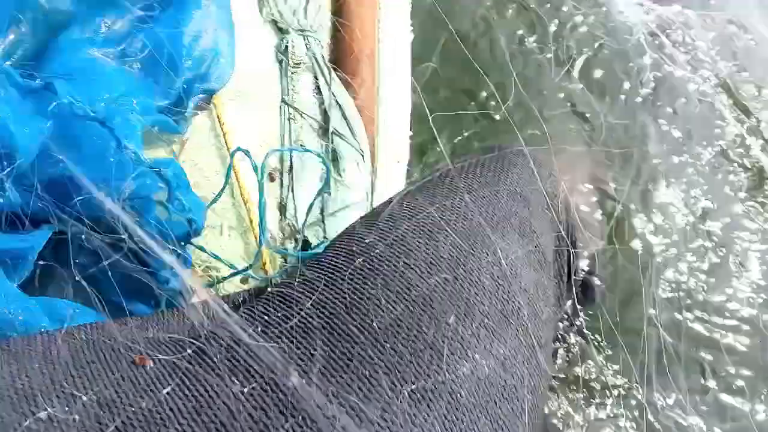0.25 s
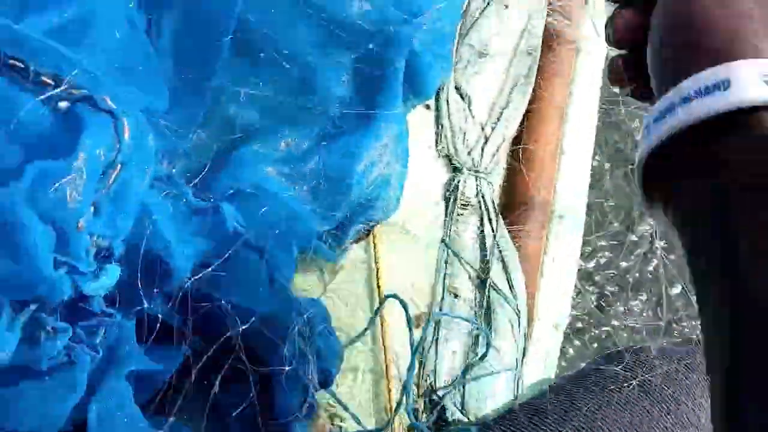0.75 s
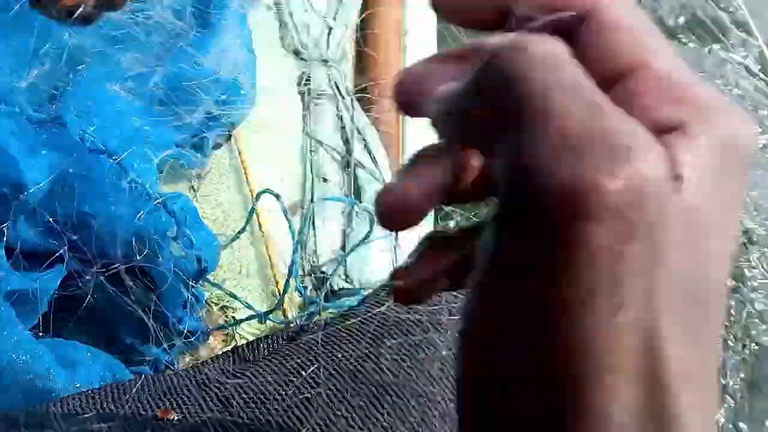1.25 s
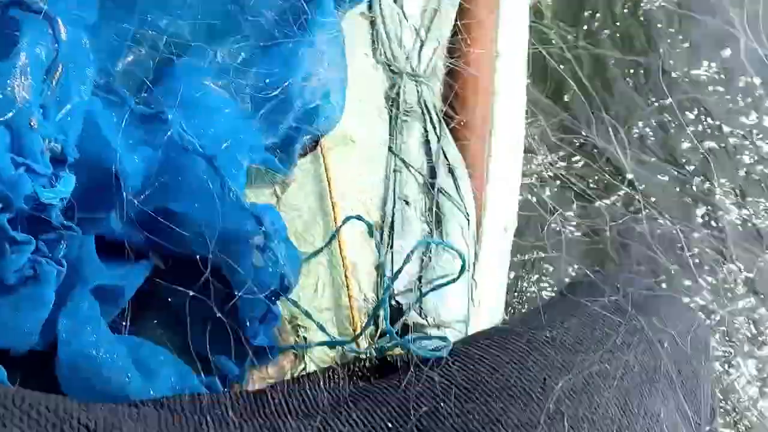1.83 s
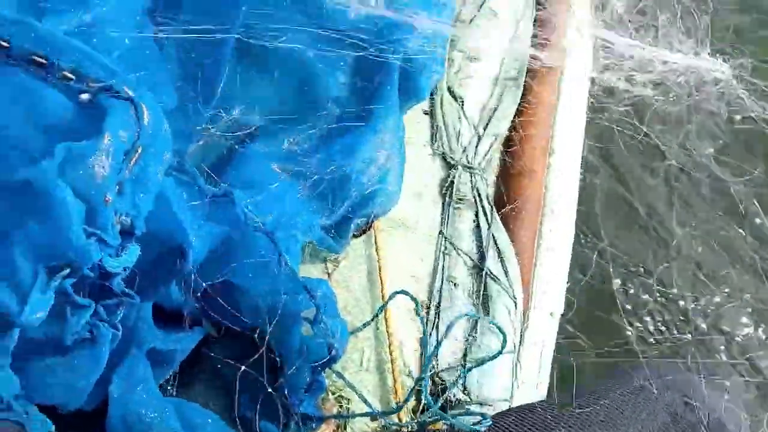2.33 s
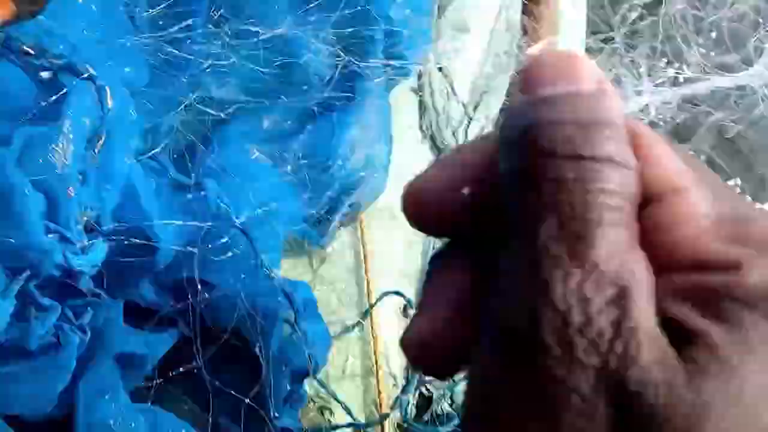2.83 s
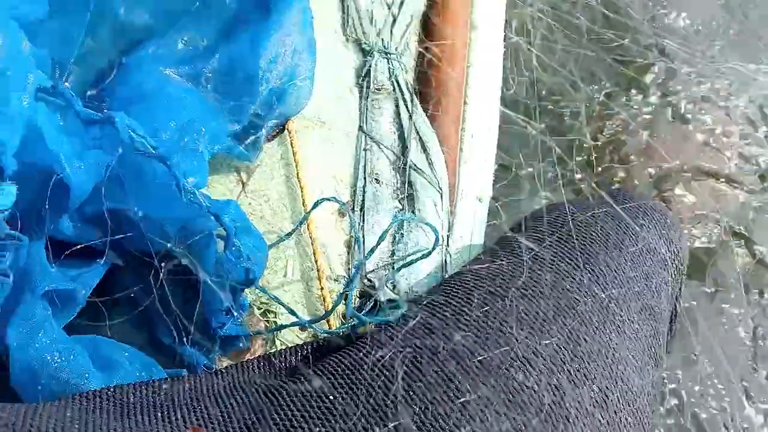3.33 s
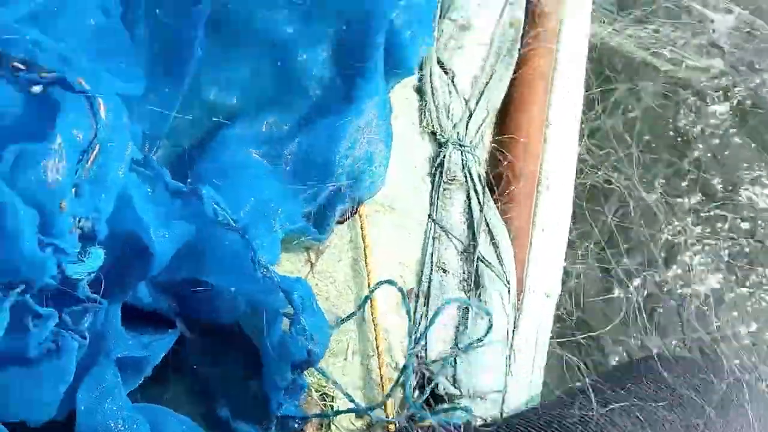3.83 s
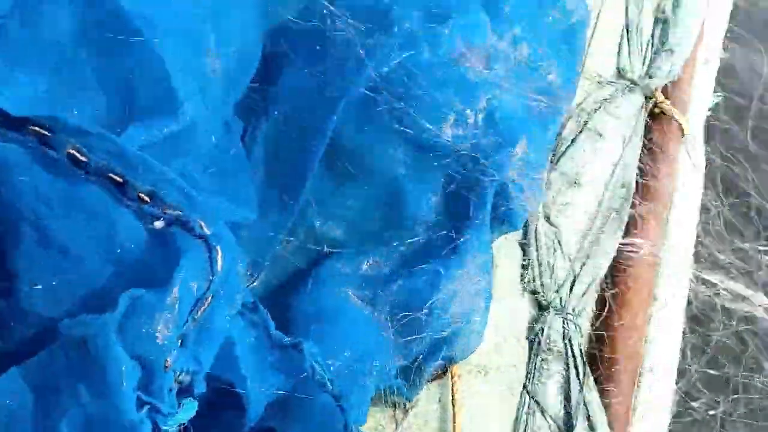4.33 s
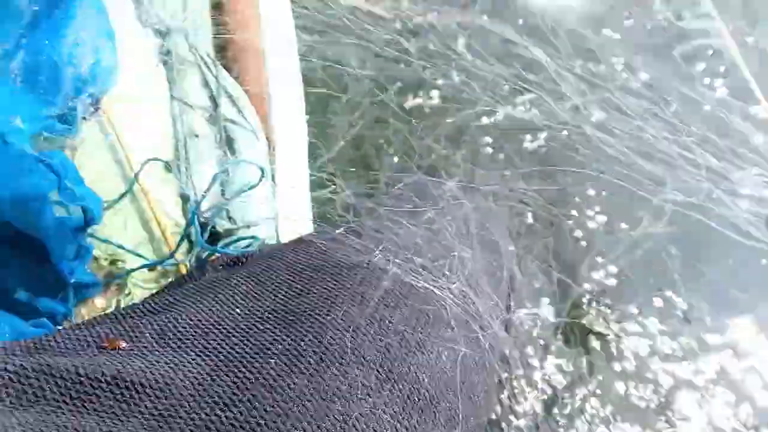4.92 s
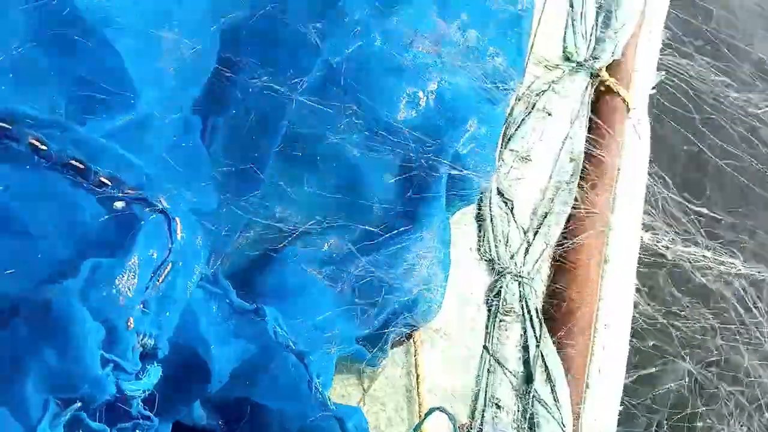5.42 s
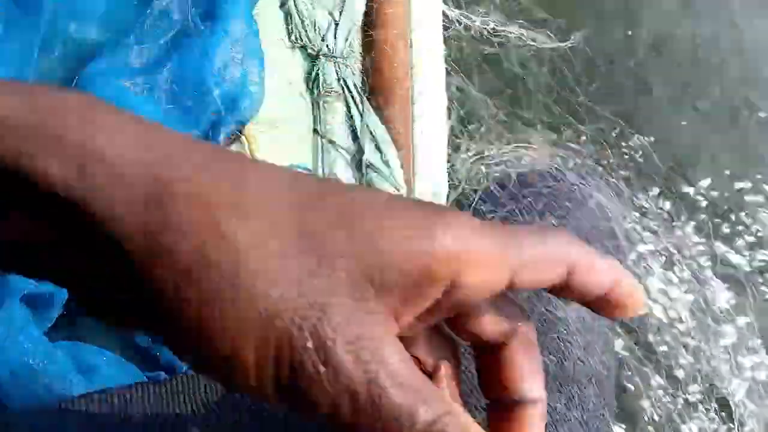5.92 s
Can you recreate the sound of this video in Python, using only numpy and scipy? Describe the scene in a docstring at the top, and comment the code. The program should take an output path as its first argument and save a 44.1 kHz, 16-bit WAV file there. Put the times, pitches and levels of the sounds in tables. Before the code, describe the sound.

Water slaps a small boat's hull, then slops, drips and plinks close by while a wet nylon net rustles and snaps in bursts.

```python
"""Water slops and gulps against a small boat and drains off a nylon net hauled in by hand, close by.
The water is sliding sine bubbles over froths of many small ones; smacks ring hull modes.
Wet filaments snap and rustle as bursts of coloured noise, denser as the pull grows.
A light wind and low heaving rumble underneath as low noise and gulps, over a faint even hiss."""
import sys
import numpy as np
from scipy import signal
from scipy.fft import rfft, irfft, next_fast_len
from scipy.io import wavfile

SR = 44100
rng = np.random.default_rng(int(sys.argv[2]) if len(sys.argv) > 2 else 0)


def transcribe(signal):
    """Save signal, clipped to [-1, 1], as a 16-bit WAV file at the path in sys.argv[1]."""
    frames = np.atleast_2d(signal).T
    limited = np.clip(frames, -1, 1)
    pcm = np.round(limited * 32767).astype(np.int16)
    wavfile.write(sys.argv[1], SR, pcm)


N = 272521
T = np.arange(N) / SR

# Water running off the net and against the hull. Each row: time in seconds, flow in dB.
FLOW_DB = [(0.0, -50.5), (0.07, -58), (0.21, -44.5), (0.26, -39.5), (0.63, -37), (1.38, -50.5),
           (1.58, -62.5), (2.11, -59.5), (2.2, -47), (2.38, -48.5), (2.87, -37), (3.02, -46.5),
           (3.34, -48.5), (3.43, -57), (3.52, -44), (3.85, -63.5), (4.25, -65.5), (4.31, -53),
           (4.38, -63.5), (4.67, -47.5), (5.1, -45.5), (5.125, -41.5), (5.52, -57.5), (5.56, -38.5),
           (6.18, -55)]
# Larger bubbles of sliding pitch. Each row: start in seconds, peak in dB, first pitch in Hz,
# pitch after one ring time in Hz, ring time in seconds.
BUBBLES = [(0.26, -27.5, 438, 373, 0.027), (0.27, -13.5, 1170, 1066, 0.0054),
           (0.238, -23.5, 650, 600, 0.013), (0.345, -25.5, 418, 388, 0.011), (0.722, -29, 516, 412, 0.021),
           (0.753, -27, 502, 760, 0.02), (0.754, -21.5, 1028, 1250, 0.012),
           (1.006, -27.5, 1230, 1170, 0.0079), (1.021, -25.5, 614, 632, 0.017),
           (1.212, -39, 984, 1107, 0.023), (2.137, -30, 473, 330.6, 0.04), (2.147, -29, 684, 631, 0.013),
           (2.247, -27.5, 198, 250, 0.026), (2.536, -24, 628, 737, 0.013), (2.588, -26.5, 634, 575, 0.018),
           (2.67, -20.5, 870, 610, 0.0052), (2.703, -21.5, 618, 628, 0.014),
           (2.754, -22.5, 610, 514, 0.0078), (2.822, -27, 560, 596, 0.013),
           (3.053, -34.5, 1170, 1570, 0.0068), (3.284, -32.5, 960, 917, 0.0096),
           (3.345, -36, 1680, 1494, 0.0086), (5.112, -25.5, 710, 560, 0.019),
           (5.21, -34, 1550, 1760, 0.005), (5.352, -30.5, 1900, 2240, 0.0038),
           (5.435, -34, 590, 547, 0.029), (5.508, -35, 2120, 2320, 0.005), (5.565, -26.5, 577, 500, 0.0069),
           (5.906, -33.5, 1050, 1310, 0.0083), (5.924, -24.5, 1500, 1910, 0.006)]
# Drops that land with a dull pat, and at 3.286, 3.324, 3.343 and 4.826 s the low, short ring under a filament
# snap. Each row: start in seconds, peak in dB, pitch in Hz.
PATS = [(0.14, -25, 2010), (0.275, -12, 1670), (0.287, -15.5, 950), (0.3105, -28, 2755), (0.363, -24, 690),
        (0.3628, -28, 1800), (0.413, -24, 945), (0.436, -22, 940), (0.508, -25, 1700), (0.902, -15.5, 343),
        (2.175, -22, 296), (2.243, -23.5, 440), (2.691, -19, 1020), (2.705, -20, 1065),
        (2.7562, -24.5, 1140), (2.8124, -24.5, 1980), (3.1107, -32, 1740), (3.286, -21.5, 2670),
        (3.324, -26, 2340), (3.343, -27, 2730), (3.5, -26.5, 850), (4.729, -22.5, 289),
        (4.826, -26.5, 2150), (4.987, -30.5, 574), (5.119, -20, 685), (5.6236, -24.5, 1310),
        (5.76, -24, 530)]
# Drops that trap a small bubble and plink. Each row: start in seconds, peak in dB, pitch in Hz.
PLINKS = [(0.14, -32, 860), (0.326, -33, 4700), (0.387, -38, 4360), (0.397, -28.5, 1750),
          (0.4615, -26, 1600), (0.494, -26.5, 718), (0.547, -30.5, 1950), (0.646, -33, 1320),
          (0.7095, -31.5, 2640), (0.7087, -31, 1600), (0.795, -31, 3840), (0.806, -26.5, 6100),
          (2.411, -27.5, 544), (2.66, -23.5, 2160), (2.742, -31, 2370), (2.7715, -31, 876),
          (2.7786, -28.5, 2700), (2.8207, -26.5, 1682), (2.8355, -34, 2200), (2.863, -28, 817),
          (2.8905, -30, 1683), (2.906, -34, 1170), (2.9204, -30, 1550), (2.928, -23.5, 1400),
          (3.048, -33.5, 1850), (3.102, -34, 816), (3.138, -34, 2380), (3.321, -33, 636),
          (3.594, -36.5, 1760), (3.622, -25.5, 2130), (3.624, -37, 1430), (3.767, -40, 1254),
          (5.112, -26, 2700), (5.1262, -33, 3200), (5.1265, -31.5, 1750), (5.194, -28, 2510),
          (5.423, -33.5, 2350), (5.432, -23.5, 2490), (5.5165, -37, 1370), (5.548, -30.5, 1200),
          (5.581, -26, 1435), (5.7023, -34, 2330), (5.8472, -37.5, 3560), (5.8885, -37, 1270),
          (6.129, -30, 2110)]
# Air pockets that sing while water fills or drains them. Each row: start in seconds, level in dB,
# first pitch in Hz, last pitch in Hz, length in seconds.
GLUGS = [(0.467, -33, 937, 488, 0.076), (0.318, -28, 620, 516, 0.014), (0.538, -31.5, 344.7, 191.7, 0.19),
         (0.92, -32, 200, 180, 0.044), (2.121, -36, 176, 250, 0.037), (2.767, -37, 500, 400, 0.052),
         (2.861, -37.5, 596, 485, 0.076), (3.05, -36.5, 347, 390, 0.086), (3.525, -34.5, 281, 224, 0.035),
         (3.63, -41, 450, 583, 0.077), (3.705, -43.5, 438, 483, 0.054), (4.696, -34, 307, 365, 0.025),
         (5.043, -52, 690, 1190, 0.037), (5.15, -40.5, 800, 1250, 0.031), (5.14, -37, 485, 616, 0.11),
         (5.219, -35, 863, 980, 0.026), (5.343, -37, 1190, 2120, 0.015), (5.57, -42.5, 489.6, 641, 0.15)]
# A wave smacks the hull. Each row: time in seconds, peak in dB, contact in ms.
SMACKS = [(.2298, -6.5, .28), (.2502, -2, .25), (.2612, -3, .42)]
# Modes of the hull panel. Each row: pitch in Hz, relative level in dB, 60 dB decay in seconds.
HULL_MODES = [(1140, 9.5, 0.058), (1450, 13, 0.014), (1740, 17, 0.0075), (2500, 5.5, 0.014),
              (2900, -18, 0.0023)]
# Effort of dragging the net over the side. Each row: time in seconds, rustle in dB.
PULL_DB = [(0.0, -54.5), (0.15, -62), (0.3, -59), (0.63, -52.5), (1.38, -64.5), (1.6, -71.5), (2.15, -67),
           (2.72, -64.5), (2.87, -53), (3.08, -71), (3.24, -51.5), (3.38, -63), (3.41, -80), (3.64, -59),
           (3.82, -64.5), (3.9, -78.5), (4.58, -74.5), (5.04, -52.5), (5.38, -69), (5.54, -62),
           (5.56, -54.5), (5.87, -66.5), (6.18, -59.5)]
# Taut filaments and knots let go. Each row: start in seconds, level in dB, treble tilt in dB, length in ms.
SNAPS = [(0.05, -29, 27, 0.7), (0.1363, -36.5, 3, 10.3), (0.276, -31.5, 1, 5.1), (0.652, -18, 20, 0.71),
         (0.6636, -36, 8, 0.87), (0.941, -39.5, 8, 1.9), (1.074, -39, -34, 2.4), (1.112, -32, -14, 0.34),
         (1.328, -34, 3, 1.55), (1.738, -45, -6, 2.6), (1.85, -37, 16, 0.4), (1.896, -41, -4, 0.52),
         (2.014, -41, 19, 1.7), (2.112, -40.5, 5, 1.5), (2.18, -35, 17, 3.3), (2.327, -36.5, 11, 1.3),
         (2.3852, -34, 20, 1.4), (2.4428, -30.5, 21, 1.14), (2.5595, -33, 16, 1.2), (2.7556, -29.5, 12, 1),
         (2.813, -23, 2, 1.7), (2.8355, -25.5, 13, 2.3), (2.856, -27, 11, 8.3), (2.8795, -26.5, 18, 0.9),
         (3.0105, -32, 20, 1.8), (3.11, -36, 16, 5), (3.1384, -33.5, 16, 3.2), (3.226, -29, 14, 0.99),
         (3.3215, -34.5, 10, 5.1), (3.344, -25.5, 24, 1.9), (3.3554, -30.5, 3, 4.4), (3.3746, -31, 15.5, 4),
         (3.533, -39, 3, 3.5), (3.643, -33.5, 11, 1.2), (3.7058, -19.5, 27.5, 0.24), (3.937, -42, -12, 0.4),
         (4.131, -41, -15, 1.26), (4.421, -48, 2, 4.7), (4.4984, -38, 10, 0.56), (4.58, -37.5, 9, 3.2),
         (4.8247, -28.5, 12, 1.9), (4.995, -33, 28, 1.5), (5.0002, -29, 5, 1.5), (5.117, -29.5, 9, 1.3),
         (5.2894, -28, -3, 0.3), (5.551, -35.5, -2, 2.2), (5.612, -31, 18, 0.97), (6.0798, -38.5, 7, 2.2)]
# Colour of wet nylon. Each row: frequency in Hz, relative level in dB.
NYLON_SPECTRUM = [(1500, 6.5), (2500, 8.5), (3600, -2), (5000, -3), (8200, 1.5), (10500, -5.5),
                  (15500, -12)]
# The hull heaves as a wave passes under it. Each row: centre in seconds, rumble lift in dB,
# length in seconds.
HEAVES = [(0.067, 7, 0.036), (0.323, 5.5, 0.095), (1.094, 6.5, 0.26), (2.146, 13, 0.015),
          (4.752, 7.5, 0.15), (5.387, 6.5, 0.1)]
# Colour of the faint background noise. Each row: frequency in Hz, relative level in dB.
BED_SPECTRUM = [(300, -7), (700, -1), (2500, -5.5), (4700, -27.5), (8200, -12.5), (12000, -36.5),
                (15700, -10.5)]

PAT_CYCLES, PLINK_CYCLES = 2.1, 6.9  # ring time in turns of the pitch
# gain at full flow, and dB moved per dB of flow
FULL_FLOW_DB = -38
TRICKLE_DB, TRICKLE_FOLLOW = -40.5, 1.09
RUMBLE_DB, RUMBLE_FOLLOW = -49.5, 0.22
BED_DB = -64
CRACK_S = 0.0005  # half width of a filament crack, at 1/e
EDGE_HZ = 15900


def water():
    """All bubble sounds; slosh and trickle share the spurts in which water leaves the mesh."""
    surges = lumps(16.8)
    return slosh(surges) + trickle(surges) + fizz() + single_bubbles() + glugs()


def slosh(surges):
    """Larger bubbles at a steady average rate, louder with the flow."""
    bubbles = froth(292.1, 1071, 400, 5.63, 3.23, 0.1405, count=22)
    return amp(curve(FLOW_DB)) * bubbles * amp(1.3 * surges)


def trickle(surges):
    """Running water: a soft noise sheet that breaks into separate plops as the flow grows."""
    gain = follow(TRICKLE_DB, TRICKLE_FOLLOW)
    slope = [(600, -64), (1100, -1.0), (2900, -6.0), (4200, -22.5)]  # (Hz, dB)
    sheet = evened(coloured(rng.standard_normal(N), slope))
    drips = evened(coloured(froth(700, 3600, 850, 7, 3.6, 0.14, count=48), slope))
    broken = np.clip((gain / amp(-38)) ** 0.45, 0, 0.76)  # share of plops
    return gain * amp(2.6 * surges) * ((1 - broken) * sheet + broken * drips)


def fizz():
    """The finest bubbles, whose level follows the pull on the net."""
    bubbles = froth(3390, 9500, 150, 16.0, 6.3, 0.077, count=16)
    return amp(curve(PULL_DB)) * bubbles * amp(-7)


def single_bubbles():
    """Clear bubbles of sliding pitch, and short pats (from drops, or under a snap) or plinking drops at a fixed
    pitch."""
    out = np.zeros(N)
    for start_s, db, hz, last_hz, ring_s in BUBBLES:
        add(out, start_s, amp(db) * bubble(hz, last_hz, ring_s))
    for drops, cycles in ((PATS, PAT_CYCLES), (PLINKS, PLINK_CYCLES)):
        for start_s, db, hz in drops:
            add(out, start_s, amp(db) * bubble(hz, hz, cycles / hz))
    return out


def glugs():
    """An air pocket sings a gliding, unsteady tone as its volume changes."""
    out = np.zeros(N)
    wobble, flutter = lumps(86.0), lumps(47.0)
    for start_s, db, hz, last_hz, length_s in GLUGS:
        span = slice(round(start_s * SR), round((start_s + length_s) * SR))
        pitch_hz = np.geomspace(hz, last_hz, span.stop - span.start)
        pitch_hz = pitch_hz * (1 + 0.018 * wobble[span])
        u = np.linspace(0, 1, len(pitch_hz))
        attack = np.minimum(u * length_s / 0.004, 1)
        swell = attack * (1 - u ** 2) * amp(2.8 * flutter[span])
        add(out, start_s, amp(db) * swell * np.sin(2 * np.pi * np.cumsum(pitch_hz) / SR))
    return out


def bubble(hz, last_hz, ring_s, rise=0.061):
    """A trapped bubble: quick start, gliding pitch, 9.5 dB of decay per ring time."""
    u = np.arange(int(3 * ring_s * SR)) / SR / ring_s  # time in ring times, as is rise
    turns = np.cumsum(hz * (last_hz / hz) ** np.minimum(u, 1.5)) / SR
    shape = (1 - np.exp(-u / rise)) * amp(-9.5 * u)
    return shape / shape.max() * np.sin(2 * np.pi * turns)


def froth(lo_hz, hi_hz, per_s, cycles, spread_db, glide, count):
    """Random bubbles of count sizes, each rung by its own click train; rms 1."""
    out = np.zeros(N)
    for hz, (a, b) in zip(np.geomspace(lo_hz, hi_hz, count), rng.uniform(-1, 1, (count, 2))):
        grain = bubble(hz, hz * (1 + glide * (a + 0.4)), cycles * 1.6 ** b / hz)
        clicks = train(per_s / count, spread_db)
        out += signal.oaconvolve(clicks, grain / np.linalg.norm(grain))[:N]
    return evened(out)


def smacks():
    """A short push and pull of water rings the hull panel, with a little hissing splash."""
    out, t_s = np.zeros(N), T[:3000]
    ring = sum(amp(db - 60 * t_s / t60_s) * np.sin(2 * np.pi * hz * t_s)
               for hz, db, t60_s in HULL_MODES)
    for time_s, db, contact_ms in SMACKS:
        u = (t_s[:88] * 1e3 - 1) / (0.46 * contact_ms)
        blow = np.convolve(ring, u * np.exp(-u ** 2))
        add(out, time_s - 44 / SR, amp(db) * blow / abs(blow).max())  # 44 samples: mid push
        splash = coloured(rng.standard_normal(len(t_s)), [(3000, -25), (8000, 0), (12000, -19)])
        add(out, time_s, amp(db - 30.0) * evened(splash) * np.exp(-t_s / 0.0011))
    return out


def net():
    """The dragged nylon: steady slipping and single releases of strain."""
    return rustle() + snaps()


def rustle():
    """Tiny filament cracks in clumps over a hiss; the harder the pull, the more slip."""
    pull = amp(curve(PULL_DB))
    busy = np.sqrt(pull / amp(-60.0))
    clumps, ticks = amp(6.0 * lumps(25.0)), np.zeros(N)
    swell = np.exp(-((T[:200] - 0.002) / CRACK_S) ** 2)
    for hz, noise in zip(np.geomspace(4000, 16000, 12), rng.standard_normal((12, 200))):
        # each filament has its own broad pitch
        crack = coloured(noise, [(hz / 2, -16.0), (hz, 0), (hz * 2, -10.0)]) * swell
        clicks = train(9 * clumps * np.sqrt(busy), spread_db=4.2)
        ticks += signal.oaconvolve(clicks, crack / np.linalg.norm(crack))[:N]
    hiss = coloured(rng.standard_normal(N), [(9500, 4), (11500, -10.0)]) * amp(1.6 * lumps(30.0))
    ticks = evened(coloured(ticks, NYLON_SPECTRUM))
    hiss = evened(coloured(hiss, NYLON_SPECTRUM))
    return pull * (busy ** 0.1 * ticks + amp(-3.0) * hiss)


def snaps():
    """A filament lets go: a nylon-coloured noise burst swells and fades, with faint noise around it."""
    out, t_ms = np.zeros(N), T[:1200] * 1e3
    noises = rng.standard_normal((len(SNAPS), 1200))
    for (start_s, db, tilt_db, length_ms), noise in zip(SNAPS, noises):
        noise = coloured(coloured(noise, NYLON_SPECTRUM), [(6500, 0), (13500, tilt_db)])
        late_ms = t_ms - 3 - length_ms / 2
        burst = np.exp(-(late_ms / (0.45 * length_ms)) ** 2)
        faint = 0.1 * np.exp(-abs(late_ms) / 3.5)
        shape = (burst + faint) * np.minimum(t_ms, 1)
        add(out, start_s - 0.003, amp(db) * evened(noise) * shape)
    return out


def rumble():
    """Wind on the microphone as low noise, and gulps of air under the planks, in lumps."""
    low_spectrum = [(40, -6.5), (80, -1.0), (200, -1.5), (350, -9.0), (800, -43.5)]  # (Hz, dB)
    wind = evened(coloured(rng.standard_normal(N), low_spectrum))
    gulps = froth(65, 330, 60, 3.5, 4, 0.2, count=16)
    lift_db = sum(db * np.exp(-((T - centre_s) / length_s) ** 2) for centre_s, db, length_s in HEAVES)
    lift = amp(lift_db + 0.34 * lumps(29.0))
    return follow(RUMBLE_DB, RUMBLE_FOLLOW) * (wind + amp(-3.0) * gulps) * lift


def noise_bed():
    """A faint, even bed of coloured background noise."""
    return amp(BED_DB) * evened(coloured(rng.standard_normal(N), BED_SPECTRUM))


def amp(db):
    """Gain of a level in dB."""
    return 10 ** (np.asarray(db) / 20)


def evened(x):
    """Scaled to rms 1."""
    return x / np.sqrt(np.mean(x ** 2) + 1e-20)


def read(points, hz):
    """A spectrum table read on a log-frequency axis."""
    f, value = np.transpose(points)
    return np.interp(np.log(hz + 1), np.log(f + 1), value)


def coloured(x, points):
    """Filtered by a (Hz, dB) table."""
    size = next_fast_len(len(x))
    gain = amp(read(points, np.fft.rfftfreq(size, 1 / SR)))
    return irfft(rfft(x, size) * gain, size)[:len(x)]


def add(mix, start_s, sound):
    """Mixes a sound in place."""
    part = mix[round(start_s * SR):][:len(sound)]
    part += sound[:len(part)]


def lumps(corner_hz):
    """Low-passed noise of rms 1, for irregular level or pitch."""
    return evened(signal.lfilter(*signal.butter(2, corner_hz, fs=SR), rng.standard_normal(N)))


def train(per_s, spread_db):
    """Sparse random clicks of either sign, a few much larger than the rest."""
    draw = rng.random((3, N))
    size = amp(spread_db * np.minimum(-np.log(draw[0] + 1e-9), 4))
    return size * np.sign(draw[1] - 0.5) * (draw[2] < per_s / SR)


def curve(rows):
    """A (seconds, dB) table read at every sample."""
    return np.interp(T, *np.transpose(rows))


def follow(full_db, share):
    """Gain of a layer that rises and falls with the flow."""
    return amp(full_db + share * (curve(FLOW_DB) - FULL_FLOW_DB))


def scene():
    """Close sources with a short, dull tail of echoes off hull and water, over the background."""
    near = water() + smacks() + net()
    t_s = T[:2600]
    echoes = rng.standard_normal(2600) * (t_s > 0.002) * amp(-60 * t_s / 0.045)
    echoes = coloured(echoes / np.linalg.norm(echoes), [(2500, 0), (9000, -8)])
    near += amp(-11.0) * signal.oaconvolve(near, echoes)[:N]
    return (near + rumble() + noise_bed())[None]


def record(dry):
    """The microphone drops the deep bass; then the band limit."""
    thin = signal.sosfilt(signal.butter(3, 55.0, "high", fs=SR, output="sos"), dry)
    low_pass = signal.firwin(301, EDGE_HZ, window=("kaiser", 10), fs=SR)
    return signal.oaconvolve(thin, low_pass[None], "same")


dry = scene()
out = record(dry)
transcribe(out)
```